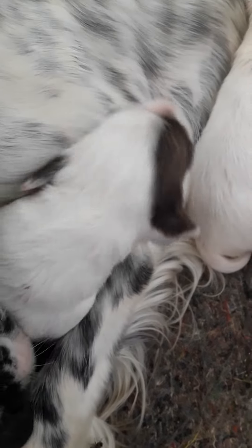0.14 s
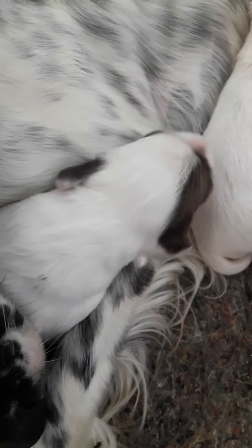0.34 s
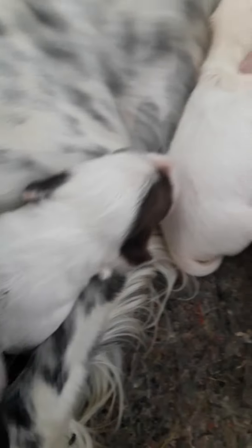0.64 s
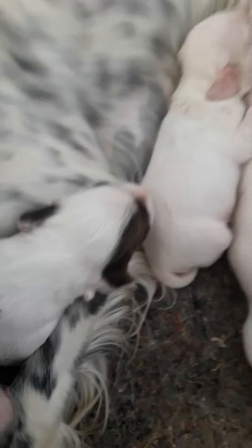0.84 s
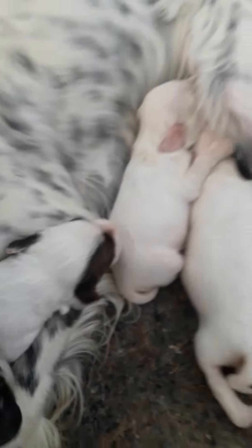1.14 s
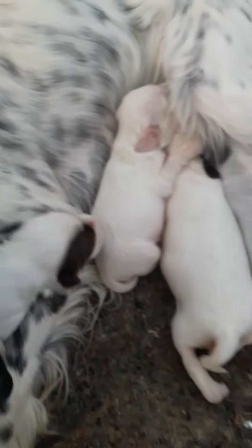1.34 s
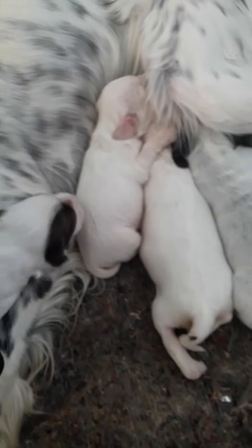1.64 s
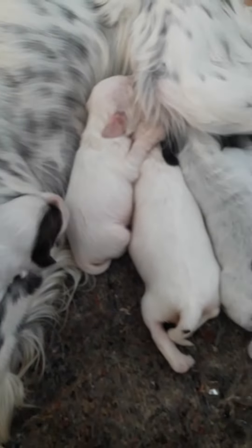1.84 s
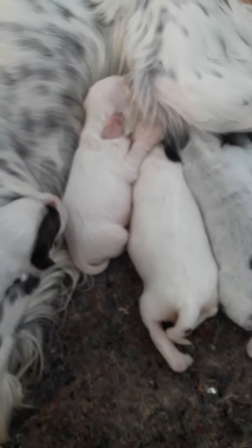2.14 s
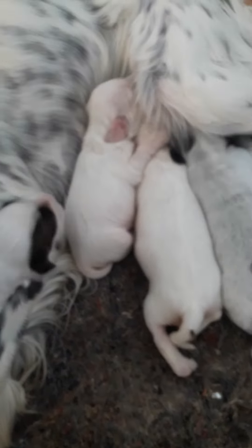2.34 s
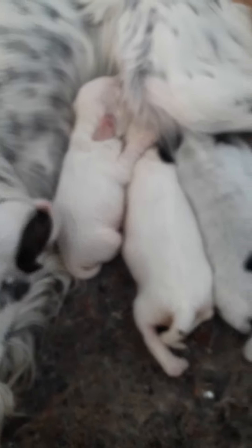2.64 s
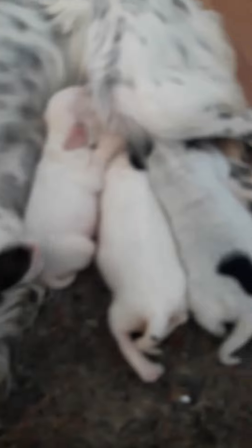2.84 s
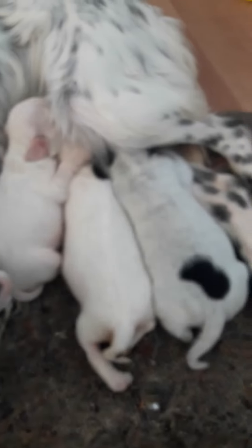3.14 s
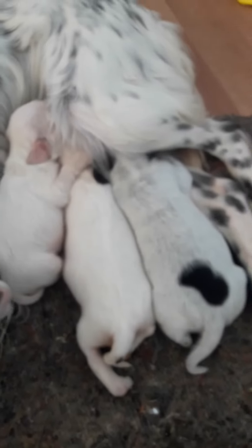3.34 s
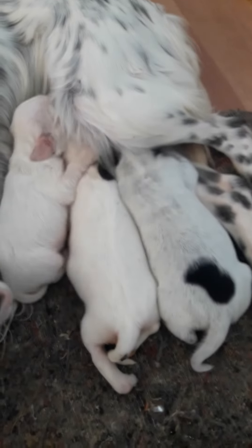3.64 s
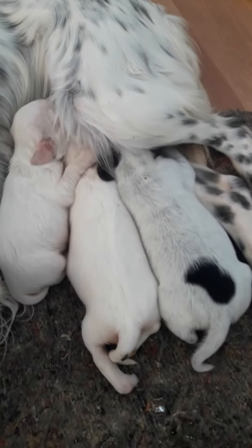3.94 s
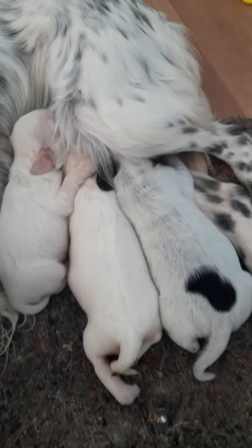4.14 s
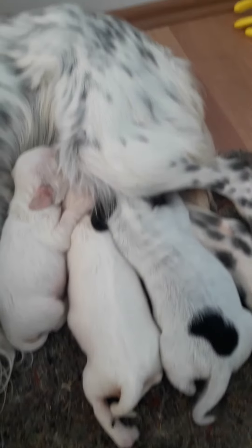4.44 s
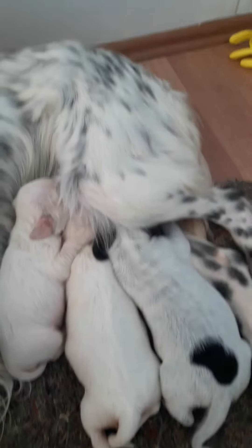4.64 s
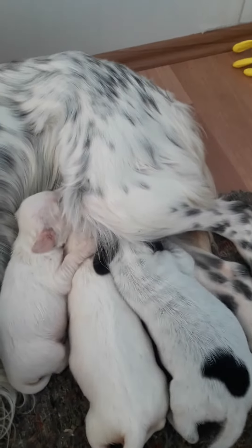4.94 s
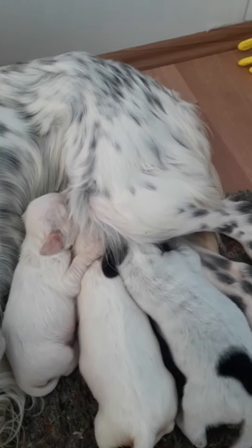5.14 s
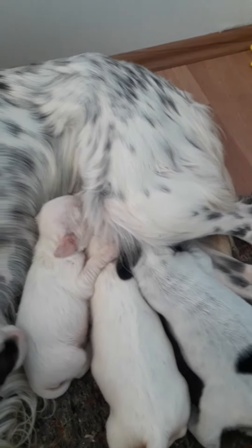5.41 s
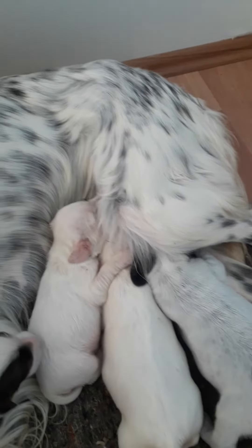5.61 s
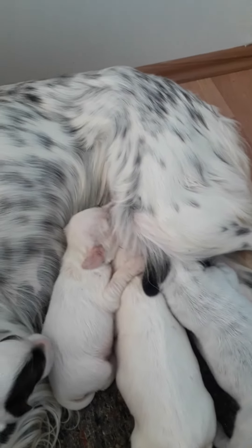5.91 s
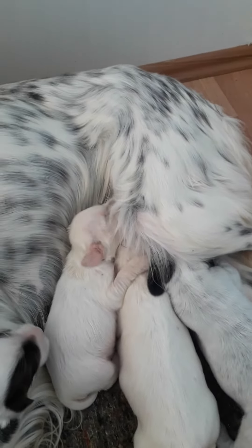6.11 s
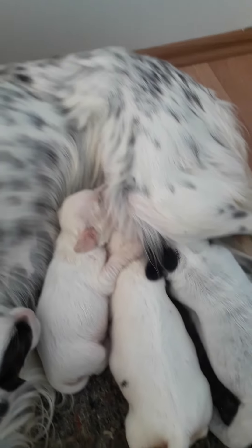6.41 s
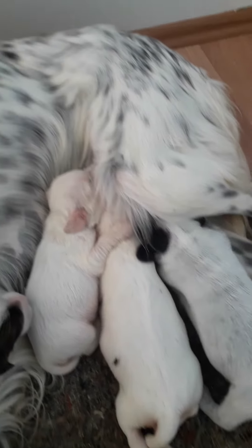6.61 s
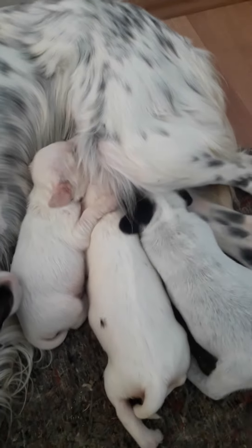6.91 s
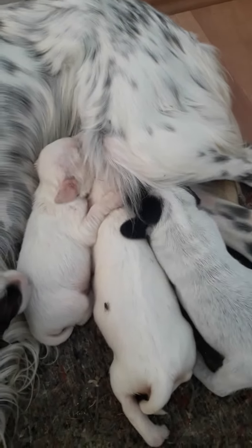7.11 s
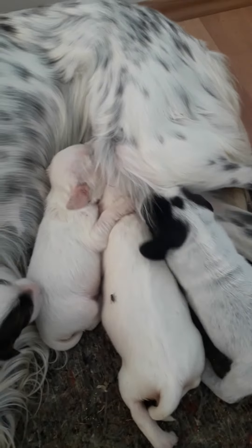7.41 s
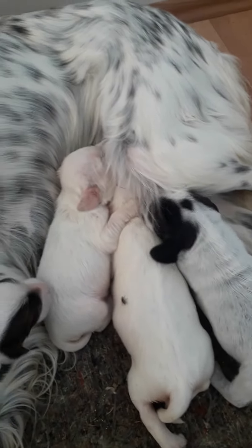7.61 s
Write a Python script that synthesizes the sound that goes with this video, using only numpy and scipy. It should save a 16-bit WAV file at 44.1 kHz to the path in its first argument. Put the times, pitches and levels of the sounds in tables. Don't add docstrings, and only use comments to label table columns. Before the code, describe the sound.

Close, nearly mono phone pickup of suckling puppies indoors. A peep and squeal open, then a lower squeal, a small whimper and two more cries, the last the strongest. Between them are soft swallows, lip clicks and the mother's airy nose breathing. After her hard snort the cries stop, leaving grunts, wet smacks, faint wheezes and dull rubbing over steady hiss.

```python
import sys
import numpy as np
from scipy import signal
from scipy.io import wavfile
from scipy.ndimage import uniform_filter1d

SR = 44100
rng = np.random.default_rng(int(sys.argv[2]) if len(sys.argv) > 2 else 0)


def linear_from_db(decibels):
    return 10 ** (np.asarray(decibels, float) / 20)


def file_out(sig):
    cols = np.atleast_2d(sig).T
    lim = np.clip(cols, -1, 1)
    pcm = np.round(lim * 32767).astype(np.int16)
    wavfile.write(sys.argv[1], SR, pcm)


N = 342216


def evened(x):
    return x / np.sqrt(np.mean(x ** 2) + 1e-20)


def read(points, hz):
    f, value = np.transpose(points)
    return np.interp(np.log(hz + 1), np.log(f + 1), value)


def unroll(rows):
    s, *columns = np.transpose(rows)
    t = np.arange(s[0], s[-1], 1 / SR)
    return s[0], [np.interp(t, s, c) for c in columns]


def add(mix, s, sound):
    part = mix[round(s * SR):][:len(sound)]
    part += sound[:len(part)]


def resonate(x, hz, width_hz):
    return signal.lfilter(*signal.iirpeak(hz, hz / width_hz, SR), x)


def tract(x, modes):
    out = np.zeros(len(x))
    for k, (hz, width_hz, db) in enumerate(modes):
        twice = resonate(resonate(x, hz, width_hz), hz, width_hz)
        out += (-1) ** k * linear_from_db(db) * twice
    return evened(out)


def noise(colour, patchy_db):
    a, b, patches = rng.standard_normal((N // 256 + 5, 513, 3)).T
    patches = uniform_filter1d(patches, size=10, axis=0)
    patches = evened(uniform_filter1d(patches, size=10, axis=1))
    colour_db = read(colour, np.fft.rfftfreq(1024, 1 / SR))[:, None]
    z = (a + 1j * b) * linear_from_db(colour_db + patchy_db * patches)
    return evened(signal.istft(z, nperseg=1024, noverlap=768)[1][:N])


def wobble(count, size):
    once = uniform_filter1d(rng.standard_normal(count), size)
    return evened(uniform_filter1d(once, size))


def ring(hz, t60, glide=0.):
    t = np.arange(SR // 4) / SR
    phase = 2 * np.pi * np.cumsum(hz * np.exp(glide * t)) / SR
    return linear_from_db(-60 * t / t60) * np.sin(phase)


def squeal(s, hz, effort_db, mouth_db, third_db, upper_db):
    # (frequency [Hz], level [dB])
    upper = [(2400, -0.5), (3500, -1.5), (4400, -8), (5500, -9.5), (6200, 15), (7200, -3.5), (8500, -44.5),
             (10500, -4.5), (12500, -20), (15000, -17)]
    upper_per_mouth = 0.67
    count = len(hz)
    hz = uniform_filter1d(hz, size=350, mode="nearest")
    turn = 2 * np.pi * np.cumsum(hz * (1 + 0.003 * wobble(count, size=90))) / SR
    k = np.arange(1, 17)[:, None]
    second = np.minimum(linear_from_db(mouth_db), .99)
    first = np.sqrt(1 - second ** 2)
    stack = linear_from_db(upper_db + upper_per_mouth * mouth_db + read(upper, k[3:] * hz))
    level = linear_from_db(effort_db) * np.vstack([first, second, second * linear_from_db(third_db), stack])
    level[1:] *= 1 + 0.18 * wobble(count, size=120)
    level[2:] *= 1 + 0.34 * wobble(count, size=25)
    voice = (level * np.cos(k * turn + k ** 2)).sum(0)
    return s, np.sqrt(2) * voice * signal.windows.tukey(count, min(1, 300 / count))


def catch(s, db, hz, glide, fall):
    t = np.arange(-.012, .028, 1 / SR)
    effort_db = db + np.minimum(2500 * t, -fall * t)
    return squeal(s + t[0], hz + glide * t, effort_db, -17 + 0 * t, third_db=-13, upper_db=-29)


def squeals():
    # (time [s], pitch [Hz], effort [dB], mouth: share of the
    # second partial [dB])
    squeal_a_start = [(0.628, 1093, -61, -12), (0.646, 1048, -39, -15), (0.698, 1050, -31.5, -21),
                      (0.716, 1043, -56, 15), (0.722, 1071, -33.5, 0), (0.756, 1074, -47, -24)]
    squeal_a = [(0.76, 901, -33.5, -10), (0.786, 862.6, -30, -5.5), (0.812, 876, -31, -6),
                (0.85, 993, -36.5, -10), (0.9, 886, -29.5, -11), (0.94, 868.6, -29.5, -9.5),
                (0.985, 843, -30, -6), (1.016, 875.4, -28, -19), (1.05, 886, -42, -24)]
    squeal_b = [(1.69, 775, -70, -7), (1.696, 765, -43, -10), (1.706, 709, -37.5, -0.5),
                (1.736, 643, -34.5, -5.5), (1.792, 683, -36, 0), (1.828, 651.7, -33, -5.5),
                (1.886, 648, -32.5, -2.5), (1.9, 675, -33.5, -2.5), (1.914, 772, -31.5, 0.5)]
    squeal_c = [(3.32, 748, -45.5, 0.5), (3.352, 769, -44, -2), (3.366, 815, -36, -8.5),
                (3.39, 888.6, -34, -14.5), (3.44, 846.4, -35, -15), (3.456, 813, -37, -12),
                (3.49, 837, -35.5, -11), (3.524, 895.5, -29, -17.5), (3.536, 922, -42, -4)]
    squeal_d = [(4.244, 959, -35.5, -20), (4.256, 920, -29, -25.5), (4.284, 820, -31, -5.5),
                (4.33, 883, -27.5, -12.5), (4.42, 843, -28, -10.5), (4.484, 828.8, -28, -2.5),
                (4.506, 846.4, -28.5, -5), (4.519, 942, -20.5, -33), (4.545, 1030, -33, -5.5)]
    whimper = [(2.462, 526, -50, -3.5), (2.478, 457, -36.5, 5), (2.498, 409, -40.5, 14.5),
               (2.522, 375, -37, -16.5), (2.546, 423, -38, -32)]
    # (peak time [s], level [dB], pitch [Hz], glide [Hz per s], fall [dB per s])
    catches = [
        (1.698, -37.5, 875, -3000, 2900),
        (1.922, -22.5, 863, 2800, 2500),
        (3.315, -34.5, 852, -500, 2906),
        (3.538, -30, 910, 2, 1500),
    ]
    # (curve, third partial below the second [dB], upper partials below the effort [dB])
    cries = [(squeal_a_start, -13.5, -29.5), (squeal_a, -25, -25.5), (squeal_b, -11, -31.5),
             (squeal_c, -17, -31.5), (squeal_d, -25.5, -34.5), (whimper, -10.5, -41.5)]
    out = np.zeros(N)
    for rows, third_db, upper_db in cries:
        s, controls = unroll(rows)
        add(out, *squeal(s, *controls, third_db, upper_db))
    for row in catches:
        add(out, *catch(*row))
    return out


def grunt(rows, roughness, chest_start_db, chest_gain_db, throat, chest):
    s, (effort_db, hz) = unroll(rows)
    count = len(hz)
    rough = np.clip(roughness + 0.07 * (effort_db.max() - effort_db), 0, 1)
    chest_db = chest_start_db + chest_gain_db * np.linspace(0, 1, count)
    turns = np.cumsum(hz * (1 + 0.173 * rough * wobble(count, size=150))) / SR
    folds = sum(np.cos(2 * np.pi * k * turns) for k in range(1, 24) if k * hz.max() < 5000)
    puffs = (0.49 + np.exp(-(turns % 1) / 1.1)) * rng.standard_normal(count)
    drive = (1 - rough) * evened(folds) + rough * evened(puffs)
    drive *= linear_from_db(1.9 * rough * wobble(count, size=220))
    voice = tract(drive, throat) + linear_from_db(chest_db) * tract(drive, chest)
    small_body = signal.butter(4, 1.4 * hz.mean(), "high", fs=SR, output="sos")
    voice = signal.sosfilt(small_body, voice)
    return s, linear_from_db(effort_db) * voice * signal.windows.tukey(count, .1)


def grunts():
    # (time [s], effort [dB], pulse rate [Hz])
    curves = [
        [(4.945, -49.5, 205), (4.98, -40.5, 191), (5.03, -41, 194.7), (5.1, -65, 191)],
        [(5.538, -47, 307), (5.565, -36.5, 330.8), (5.595, -34.5, 413.5), (5.63, -32, 337), (5.66, -43.5, 331),
         (5.71, -62, 330)],
        [(6.755, -55, 191.6), (6.779, -45, 195), (6.815, -46, 187)],
        [(7.072, -55, 190), (7.092, -54, 190.3), (7.12, -46, 200)],
    ]
    # (roughness [0-1], chest at the start [dB], chest gain by the end [dB])
    voicings = [
        (.15, -8.5, 18.5),
        (0.27, -3.5, 13.5),
        (.8, -27, 28),
        (0.73, 9, -11.5),
    ]
    # (frequency [Hz], width [Hz], level [dB])
    throat = [(591, 79, 1.5), (900, 157, 4), (1200, 215, 5), (1600, 130, -4.5), (1900, 330, -3)]
    # (frequency [Hz], width [Hz], level [dB])
    chest = [(352, 220, 0)]
    out = np.zeros(N)
    for rows, voicing in zip(curves, voicings):
        add(out, *grunt(rows, *voicing, throat, chest))
    return out


def gulp(s, db, hz, mouth_db, t60):
    t = np.arange(SR // 4) / SR
    puff = tract(rng.standard_normal(len(t)), [(800, 790, 26), (1300, 460, -40), (2200, 560, -13)])
    puff *= linear_from_db(mouth_db - 60 * t / (1.14 * t60)) * (1 - np.exp(-t / 0.0014))
    thump = ring(1.12 * hz, t60, glide=-14) * (1 - np.exp(-t / 0.0019))
    return s, linear_from_db(db) * (2.2 * thump + 0.9 * puff)


def gulps():
    # (time [s], peak [dB], cavity [Hz], mouth part [dB], t60 [s])
    swallows = [(0.312, -41, 367, -3, 0.092), (0.768, -31, 324, 6.5, 0.015), (1.169, -44.5, 358, 4, 0.14),
                (1.618, -48, 362, -3, 0.021), (2.52, -47, 402, 10.5, 0.068),
                (3.172, -38.5, 290, -12, 0.021), (3.258, -43.5, 262, -21, 0.022),
                (4.665, -60, 260, 10.5, 0.058), (5.805, -61, 380, 11.5, 0.14), (6.132, -58, 265, 0, 0.068),
                (6.277, -44, 308, -12, 0.033), (6.797, -35.5, 425, -1, 0.028), (6.904, -37, 277, 5.5, 0.05),
                (7.473, -42.5, 297, -5.5, 0.033), (7.699, -65.5, 268, 11, 0.16)]
    out = np.zeros(N)
    for row in swallows:
        add(out, *gulp(*row))
    return out


def smack(s, db, low_hz, high_hz, tick_db, t60):
    t = np.arange(SR // 10) / SR
    crack = rng.standard_normal(len(t)) * linear_from_db(-60 * t / t60) * (1 - np.exp(-t / 0.0012))
    crack[20] += 6.0
    rings = tract(crack, [(low_hz, .18 * low_hz, 0), (high_hz, .18 * high_hz, -1.5)])
    tick = np.gradient(np.gradient(crack))
    return s, linear_from_db(db) * (0.81 * rings / abs(rings).max() + 0.32 * linear_from_db(tick_db) * tick)


def smacks():
    # (time [s], peak [dB], ring [Hz], second ring [Hz])
    dull = [(.65, -40, 5000, 5500), (.718, -24.5, 2610, 4650), (.724, -18.5, 2040, 5000),
            (.294, -48, 900, 2200), (1.144, -44, 900, 2200), (1.173, -38.5, 800, 1470),
            (2.524, -49, 800, 1440), (2.831, -32, 2240, 3450), (3.901, -34, 1880, 2510),
            (3.968, -39.5, 1140, 2000), (3.982, -28, 2450, 4460), (4.397, -48, 3800, 3960),
            (4.597, -33, 2180, 2600), (4.635, -41, 3970, 4530), (4.899, -32.5, 3800, 5000),
            (4.927, -34.5, 2310, 3800), (5.61, -25.5, 3150, 3800), (5.646, -27, 3030, 3550),
            (5.84, -36.5, 1600, 2660), (5.844, -36, 2200, 2950), (6.363, -35.5, 1800, 2360),
            (6.424, -41.5, 1460, 4200), (6.8, -36.5, 900, 3170)]
    # (time [s], peak [dB], ring [Hz], second ring [Hz], treble tick [dB])
    bright = [(1.016, -40, 4670, 5220, -8), (5.625, -34, 3000, 4500, 3), (6.139, -37.5, 2320, 4330, -1.5),
              (6.358, -38.5, 1700, 2160, -23), (6.516, -40, 4000, 5900, -12), (6.607, -46, 5860, 7500, 20),
              (6.638, -33.5, 4330, 5800, 4), (6.675, -19.5, 2060, 3410, -12),
              (6.676, -26.5, 4900, 6300, -14), (6.715, -31.5, 3900, 6240, -4.5),
              (7.495, -38.5, 3560, 5500, 4.5)]
    out = np.zeros(N)
    for row in dull:
        add(out, *smack(*row, tick_db=-30, t60=0.024))
    for row in bright:
        add(out, *smack(*row, t60=0.018))
    return out


def wheeze(start, end, db, hz, width_hz):
    air = tract(rng.standard_normal(SR // 2), [(hz, width_hz, 0)])[:round((end - start) * SR)]
    return start, linear_from_db(db) * air * signal.windows.tukey(len(air), .6)


def wheezes():
    # (start [s], end [s], level [dB], frequency [Hz], width [Hz])
    whistles = [(0.098, 0.493, -68.5, 743, 120), (0.396, 0.595, -60, 3550, 900),
                (2.461, 2.575, -54, 1480, 1300), (2.743, 2.832, -60, 398, 530),
                (3.021, 3.136, -63.5, 626, 70.5), (6.108, 6.203, -56, 1900, 1200),
                (6.57, 6.694, -63.5, 1900, 253), (6.67, 6.916, -66, 3230, 350),
                (7.123, 7.27, -58, 1140, 168), (7.114, 7.24, -63, 2440, 300),
                (7.272, 7.466, -65.5, 1200, 200)]
    out = np.zeros(N)
    for row in whistles:
        add(out, *wheeze(*row))
    return out


def growl():
    # (time [s], effort [dB], pulse rate [Hz])
    curve = [(4.05, -52, 95.2), (4.08, -44.5, 85), (4.1, -49, 77), (4.19, -51, 80.7), (4.24, -58, 79),
             (4.33, -66.5, 78)]
    # (frequency [Hz], width [Hz], level [dB])
    throat = [(537, 124, 2.5), (910, 210, -3.5), (1300, 170, -22), (1800, 570, -15)]
    # (frequency [Hz], width [Hz], level [dB])
    chest = [(102, 43, -5), (200, 114, 2.5), (350, 157, 5)]
    out = np.zeros(N)
    add(out, *grunt(curve, .9, 4, 6, throat, chest))
    return out


def breath(t, start, held, flow_db, sag_db):
    u = t - start
    rise = 0.014 * linear_from_db(0.83 * (-44 - flow_db))
    sag = sag_db * np.clip(u / held, 0, 1)
    fall = 111 * np.maximum(u - held, 0)
    return np.clip(u / rise, 0, 1) * linear_from_db(sag - fall)


def breaths():
    # (start [s], held [s], air flow [dB], hiss [dB], sag while held [dB])
    puffs = [
        (.75, 0.28, -49.5, -63, -20),
        (1.379, 0.65, -53.5, -62, -4.5),
        (2.55, 0.49, -56, -91, -3.5),
        (3.349, 0.27, -70.5, -80, 5),
        (4.0, 0.16, -61.5, -87, -5),
        (4.4, 0.24, -56.5, -64.5, -2.5),
        (5.158, 0.54, -41.5, -47, -8.5),
        (5.78, 0.52, -57, -69.5, -8.5),
        (6.78, 0.19, -68, -84, 12),
    ]
    # (frequency [Hz], width [Hz], level [dB])
    nose = [(1350, 400, 0), (2000, 760, 2), (2660, 950, 2), (3800, 670, 5.5), (5000, 1240, -1.5),
            (7500, 830, -17)]
    # (frequency [Hz], density [dB per Hz])
    hiss_colour = [(3530, -18), (6000, 0.5), (7580, -5), (8470, -15.5), (10300, -2), (12500, -1),
                   (15200, -6.5)]
    t = np.arange(N) / SR
    flow, hiss = linear_from_db(-75), linear_from_db(-73)
    for start, held, flow_db, hiss_db, sag_db in puffs:
        air = breath(t, start, held, flow_db, sag_db)
        flow = np.hypot(flow, linear_from_db(flow_db) * air)
        hiss = np.hypot(hiss, linear_from_db(hiss_db) * air)
    rush = noise([(900, 1), (1300, 5.9), (9000, 8.7)], patchy_db=3)
    return flow * tract(rush, nose) + hiss * noise(hiss_colour, patchy_db=1.0)


def sniff():
    # (time [s], level [dB])
    swell = [
        (2.17, -73),
        (2.26, -45),
        (2.38, -64.5),
    ]
    # (frequency [Hz], density [dB per Hz])
    colour = [(410, -63), (700, -37), (958, -19), (1580, -30), (2360, -7.5), (3710, -14), (4360, -26),
              (6050, -21.5), (7870, -49), (14000, -30)]
    out = np.zeros(N)
    s, (db,) = unroll(swell)
    add(out, s, linear_from_db(db) * noise(colour, patchy_db=1.5)[:len(db)])
    return out


def snort():
    # (frequency [Hz], level [dB], t60 [s])
    rings = [(205, -22, 0.097), (350, -24, 0.063), (910, -34.5, 0.044), (1444, -19.5, 0.029),
             (1900, -29, 0.046), (2814, -26.5, 0.039)]
    snort_s = 5.162
    out = np.zeros(N)
    t = np.arange(SR // 4) / SR
    knock = sum(linear_from_db(db) * ring(hz, t60) for hz, db, t60 in rings)
    knock *= signal.windows.tukey(len(t), .012)
    for late_s, db in [(-.004, -12), (.0015, 0.5), (.008, -32), (.019, -7.5)]:
        add(out, snort_s + late_s, linear_from_db(db) * knock * (1 + 0.26 * wobble(len(t), size=40)))
    blast = tract(rng.standard_normal(len(t)), [(hz, 0.15 * hz, db) for hz, db, t60 in rings])
    add(out, snort_s, linear_from_db(-33.5 - 60 * t / 0.56) * blast)
    return out


def shuffle():
    # (time [s], level [dB], fade [dB per s])
    shoves = [
        (0.328, -45.5, 449.5),
        (5.19, -47.5, 56),
        (6.93, -51, 43),
        (7.13, -58, 96),
    ]
    # (frequency [Hz], density [dB per Hz])
    rug = [(70, -18), (130, -29), (200, -3.5), (300, -5), (450, -4), (900, -15), (1400, -6.5),
           (2500, -41.5)]
    t = np.arange(N) / SR
    rub = noise(rug, patchy_db=1.5) * linear_from_db(1.5 * wobble(N, size=200))
    push = np.zeros(N)
    for s, db, fade in shoves:
        push += np.clip((t - s) / 0.0017, 0, 1) * linear_from_db(db - fade * abs(t - s))
    return rub * push


def room(x):
    # (frequency [Hz], t60 [s])
    decay = [(200, 0.25), (900, 0.3), (2000, 0.45), (5000, 0.41), (12000, 0.064)]
    taps = np.zeros(SR // 2)
    at = np.arange(150, len(taps) - 20, 20)
    taps[at + rng.integers(0, 20, len(at))] = rng.choice([-1., 1.], len(at))
    hz, t, z = signal.stft(taps, SR, nperseg=256)
    tail = signal.istft(z * linear_from_db(-60 * t / read(decay, hz)[:, None]), SR, nperseg=256)[1]
    return signal.fftconvolve(x, tail / np.linalg.norm(tail))[:N]


def floor_hiss():
    # (frequency [Hz], density [dB per Hz])
    floor = [(15, -45), (25, -16), (102, 12), (166, -9), (236, 0.5), (489, -10), (863, -7), (1520, -12),
             (2550, -8.5), (3160, -12), (5280, 0), (5730, -1.5), (8360, -40), (14800, -12.5), (16000, -10)]
    return linear_from_db(-58) * noise(floor, patchy_db=2)


def apart_hiss():
    # (frequency [Hz], density [dB per Hz])
    apart = [(15, -35), (25, -9), (92, -8), (354, -14), (531, -14), (911, -14.5), (2410, -17.5),
             (4870, -11.5), (7110, -23.5), (16000, -15)]
    return linear_from_db(-72) * noise(apart, patchy_db=1.5)


def scene():
    voices = squeals() + grunts() + growl()
    mouths = gulps()
    lips = smacks() + wheezes()
    echo = linear_from_db(-8) * room(voices) + linear_from_db(-5.5) * room(mouths + linear_from_db(-10) * lips)
    mother = breaths() + sniff() + snort()
    mid = voices + mouths + lips + mother + echo + shuffle() + floor_hiss()
    side = apart_hiss() + linear_from_db(-66) * echo
    return np.array([mid + side, mid - side])


def low_pass(x):
    return signal.sosfilt(signal.butter(12, 16990, fs=SR, output="sos"), x)


def record(dry):
    bass_cut = signal.butter(2, 55, "high", fs=SR, output="sos")
    bassless = signal.sosfilt(bass_cut, dry)
    edge = signal.firwin(511, 15900, window=("kaiser", 9), fs=SR)
    mix = signal.oaconvolve(bassless, edge[None], "same")
    return low_pass(mix)


dry = scene()
out = record(dry)
file_out(out)
```